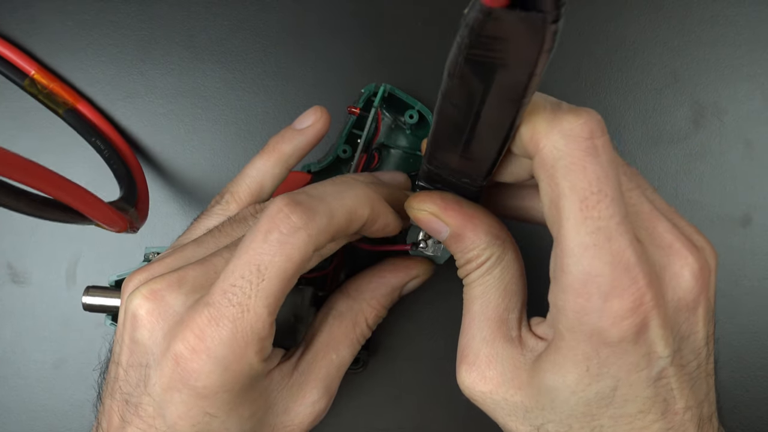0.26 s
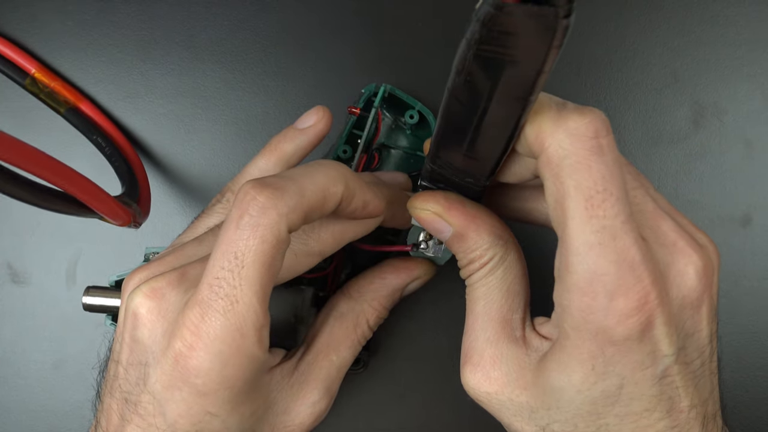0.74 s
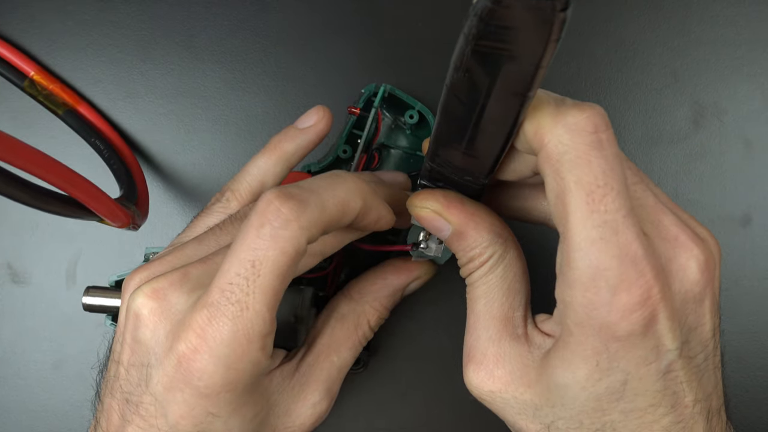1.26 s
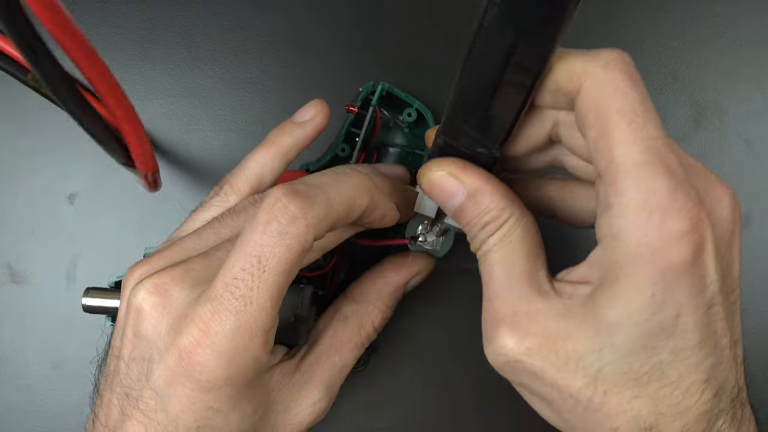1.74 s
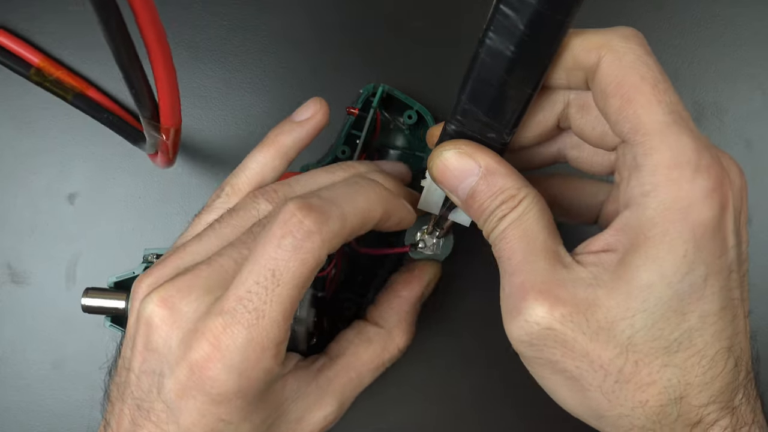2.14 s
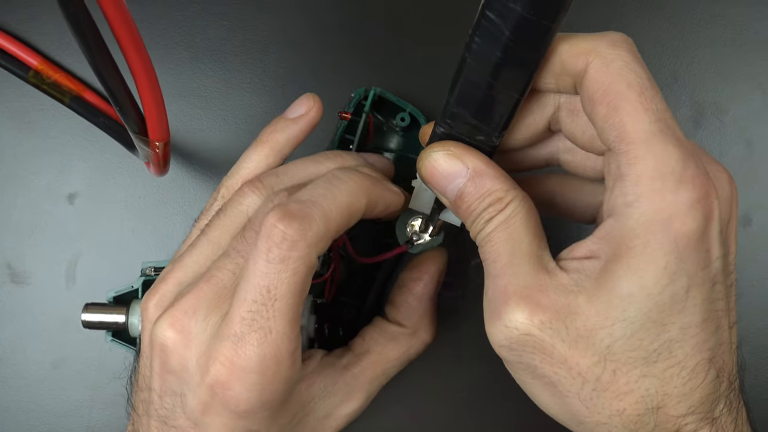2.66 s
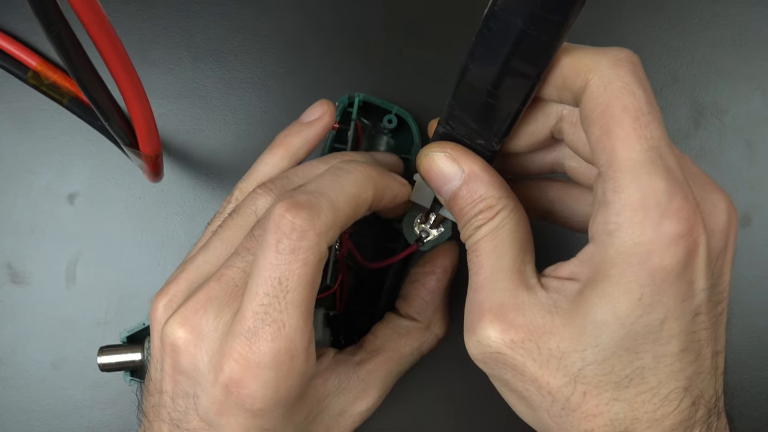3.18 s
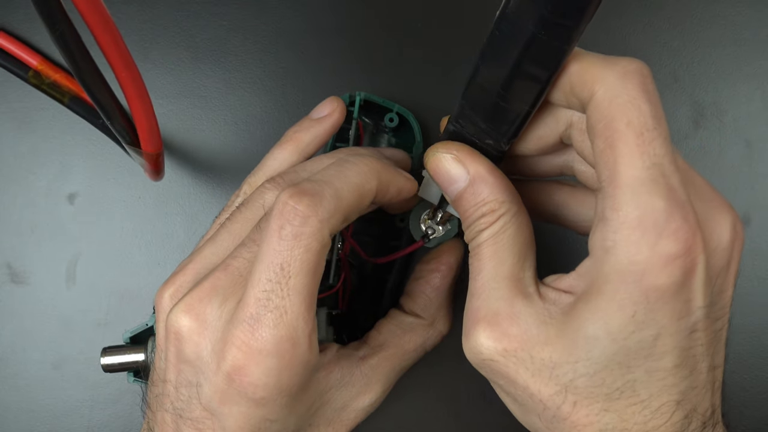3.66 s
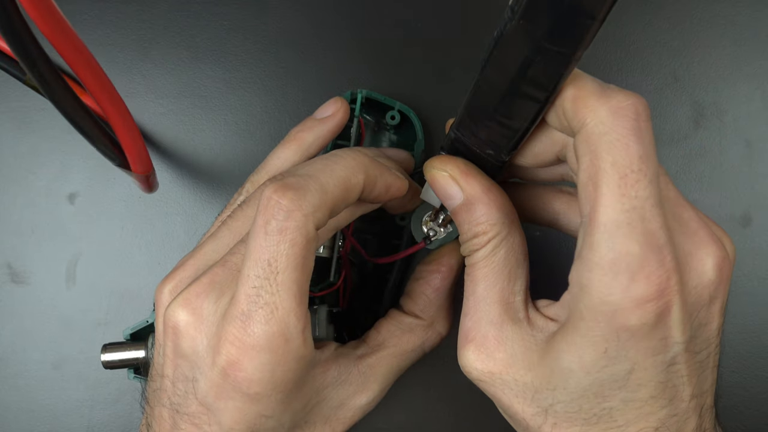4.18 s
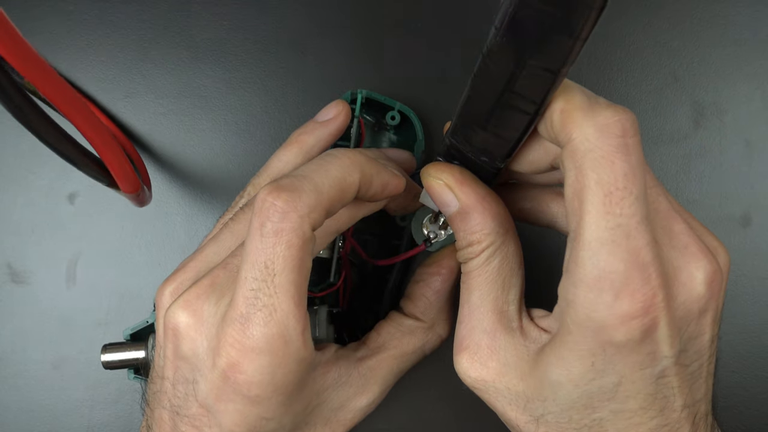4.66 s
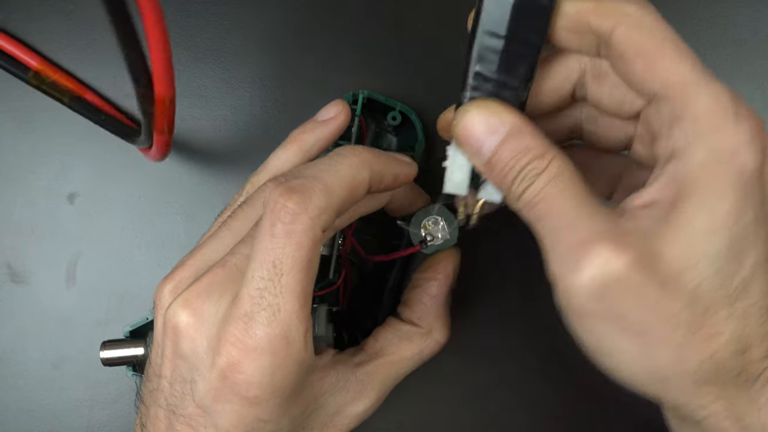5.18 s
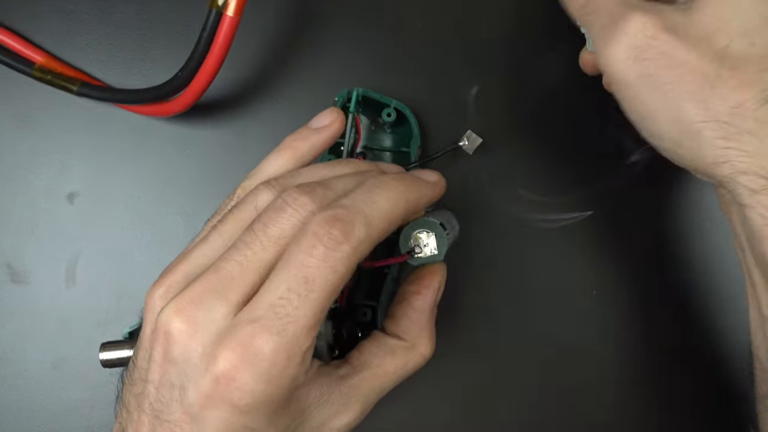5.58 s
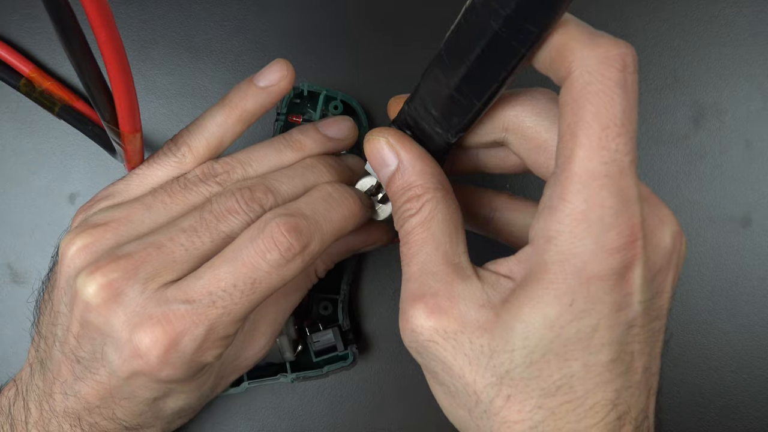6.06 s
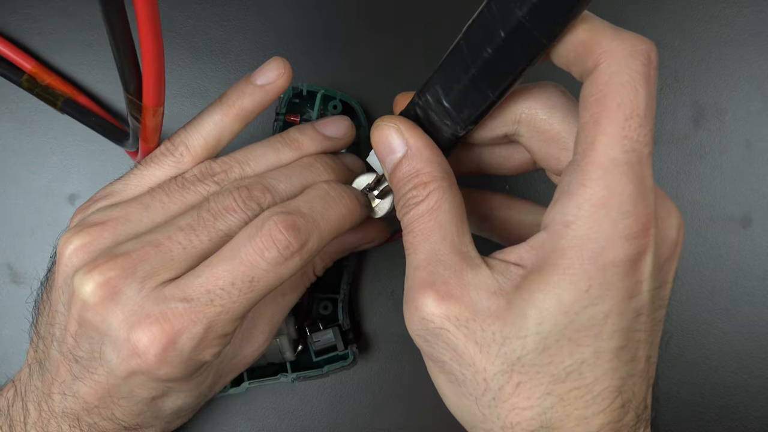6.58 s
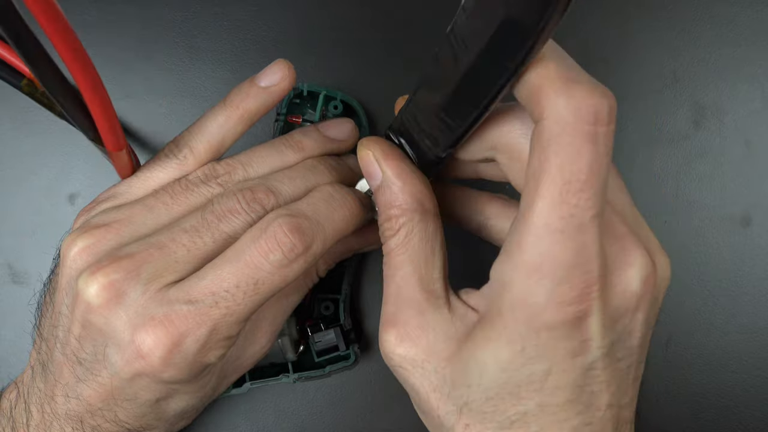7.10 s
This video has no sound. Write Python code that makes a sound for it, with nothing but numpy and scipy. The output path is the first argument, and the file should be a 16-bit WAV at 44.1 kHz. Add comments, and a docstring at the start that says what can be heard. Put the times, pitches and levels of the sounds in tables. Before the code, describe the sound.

Close-miked in a small, fairly dry workroom with faint hiss, fan whine and mains hum. A low engine drone rises and fades outside. Electrode tips tick and scrape on metal, then a spot weld cracks with a split-second sizzle. Tiny plastic taps follow, then a second weld. The tool and parts land in hard clacks, hands brush the bench, and near-quiet returns.

```python
"""A workbench with a handheld spot welder, in a small room with air hiss, a fan whine and mains hum.
Twice a switch clicks, a contactor slams shut, the weld sizzles and the contactor drops out: noise bursts and
noise grains ring the contactor's resonances. Parts knock, tap and slide on the bench: filtered bursts, damped
modes and uneven noise. An engine drones outside in two passes: a near sine with weak wavering overtones."""
import sys
import numpy as np
from scipy import signal
from scipy.fft import rfft, irfft
from scipy.io import wavfile
from scipy.ndimage import uniform_filter1d

SR = 44100
rng = np.random.default_rng(int(sys.argv[2]) if len(sys.argv) > 2 else 0)


def unload_audio(sound):
    """Save the sound as a 16-bit wav file, at the path given as the first command line argument."""
    columns = np.transpose(np.atleast_2d(sound))
    # keep every value between -1 and 1, then stretch to whole-number steps
    steps = np.round(np.clip(columns, -1, 1) * 32767)
    wavfile.write(sys.argv[1], SR, steps.astype(np.int16))


N = 323557
T = np.arange(N) / SR

# Room hiss spectrum: (frequency [Hz], relative density [dB per Hz])
AIR_COLOUR = [(15, -35), (30, -15.5), (45, -5), (70, -13.5), (100, -8), (125, -9), (195, -8), (300, -13),
              (450, -16.5), (700, -14.5), (1050, -13.5), (1350, -21), (4000, -27), (16000, -30)]
# Hiss level, mid channel: (time [s], level [dB])
AIR_LEVEL = [(0, -60.5), (1.5, -60.5), (3.3, -61.5), (4.5, -65), (5.2, -62), (5.9, -58.5), (5.96, -63.5),
             (6.9, -63.5), (7.34, -61)]
AIR_SIDE_DB = -10  # re mid
FAN_HZ, FAN_WIDTH_HZ, FAN_DB = 1093, 25, -72.5
HUM_HZ, HUM_DB = 100.5, -68.5

# Engine outside, one table a pass: (time [s], firing rate [Hz], level of the fundamental [dB])
ENGINE_PASSES = [
    [(0, 43.4, -45), (.12, 44.5, -47.5), (.4, 47.67, -42), (.75, 48.54, -43.5), (1.15, 51.34, -35.5),
     (1.47, 51.27, -42), (1.63, 50.8, -39.5), (2.0, 49.46, -46.5), (2.06, 47.76, -58), (2.45, 43.76, -57),
     (2.62, 41, -71), (2.78, 38.1, -58), (3.7, 37.1, -70), (4.5, 37.1, -72)],
    [(6.5, 43.1, -78.5), (7.19, 46.7, -58.5), (7.24, 47.7, -46.5), (7.34, 50.3, -58)],
]
# Engine overtones: (multiple of firing rate, relative level [dB])
ENGINE_ORDERS = [(2, -0.5), (3, -4.5), (4, -1), (5, -15)]
OVERTONES_DB, COASTING_DB = -17.5, -7  # re fundamental; further change while the firing rate falls
THROTTLE_S = .1  # smoothing of that change

# Electrode tips click on the strip: (time [s], peak before body ring [dB], centre [Hz], width / centre)
TIP_CLICKS = [(0.327, -38.5, 1030, 0.21), (.329, -45.5, 3020, 2.5), (.339, -38.5, 1080, .4),
              (.365, -51, 2350, .23), (.405, -51, 2400, .23), (.4235, -32, 3600, 1.1),
              (.445, -25, 3800, .9), (.467, -23, 3600, 1.1), (.480, -34.5, 940, .8), (.488, -31, 3500, 1.5),
              (.794, -34, 900, .9), (.808, -38.5, 1084, .3), (4.541, -27, 5000, 1.8),
              (4.543, -29.5, 897, 0.58)]
TIP_CLICK_T60_S = 0.05
# Electrode tips scrape into place: (time [s], level [dB])
SCRAPE = [(.33, -61), (.38, -59.5), (.418, -63.5), (.424, -47.5), (.44, -47.5), (.447, -37), (.47, -36),
          (.5, -44), (.525, -52)]
# Scrape spectrum: (frequency [Hz], relative density [dB per Hz])
SCRAPE_COLOUR = [(300, -18), (1000, -1), (1600, -11.5), (2400, -4.5), (2900, -8), (3450, 4), (3950, -11),
                 (4500, -3), (5500, -8.5), (7200, -6), (10000, -16.5), (16000, -27.5)]
# Welds; levels before body ring: (tips land [s], landing [dB], switch [s], switch centre [Hz],
# current on [s], current off [s], pull-in [dB], drop-out [dB], bounce after current off [s])
WELDS = [(.817, -23.5, .828, 810, .8440, 0.892, -5, -3.5, .022),
         (4.529, -31.5, 4.558, 1400, 4.5623, 4.6045, -5.5, -4, .015)]
# Tips landing: (t60 [s], centre [Hz], width / centre)
LANDING = (0.055, 3500, 0.74)
# Switch click: (level re pull-in [dB], t60 [s], width / centre)
SWITCH = (-13.5, .03, 0.54)
PRESS_DB, PRESS_RISE_DB = -11.5, 7  # tips grind in until current on: start re landing; swell
# Contactor closing: (time after current on [s], level re pull-in [dB], t60 [s], centre [Hz], width / centre)
PULL_IN = [(0, 1, .006, 8800, 1.15), (.004, -1.5, .04, 7000, 1.6), (.0063, -8, .04, 1680, .85)]
# Sizzle while current flows, one row a weld, before body ring:
# (start after current on [s], first level [dB], last level [dB])
SIZZLE = [(.005, -26.5, -18.5), (.005, -27, -27)]
# Sizzle spectrum: (frequency [Hz], relative density [dB per Hz])
SIZZLE_COLOUR = [(200, -39.5), (600, -15), (1500, -6), (2300, -9), (3500, -3.5), (7000, -11.5),
                 (12000, -17), (16000, -19)]
# Contactor opening: (level re drop-out [dB], t60 [s], centre [Hz], width / centre)
DROP_OUT = [(-10, .011, 9000, 2.8), (0, .035, 2850, 1.9)]
# Contactor bounce: (level re drop-out [dB], t60 [s], centre [Hz], width / centre)
BOUNCE = (-15, 0.2972, 2270, 3.2)
# Contactor body resonances: (centre [Hz], width [Hz], relative gain [dB])
CONTACTOR = [(1500, 650, -5), (2340, 130, -1), (3435, 83, 2), (4400, 400, -6), (6670, 600, -3.5),
             (7500, 400, -5), (9700, 1600, -7.5)]

# Light knocks on the bench: (time [s], crack peak [dB], crack centre [Hz], boom before bench modes [dB])
KNOCKS = [(.462, -43.5, 280, -43), (.814, -28.5, 240, -35), (2.418, -49, 2000, -75),
          (2.732, -47, 3300, -75), (4.524, -40, 220, -49), (4.546, -40, 230.3, -52.5),
          (4.608, -40, 420, -38.5), (4.909, -45.5, 2190, -68.5), (5.156, -46, 2830, -53),
          (5.185, -48, 3180, -70), (5.277, -26.5, 8000, -52), (5.290, -33, 2390, -54.5),
          (5.359, -51, 5970, -64.5), (5.52, -30, 420, -61), (5.534, -30.5, 2500, -61),
          (5.628, -35.5, 2170, -39.5), (5.698, -49.5, 5000, -64.5), (5.802, -13.5, 1100, -35),
          (5.818, -23.5, 474, -50), (7.119, -44.5, 586, -58), (7.148, -44, 550, -49),
          (7.18, -51.5, 420, -60.5)]
KNOCK_T60_S = 0.048  # at 1 kHz; goes as 1 / sqrt(frequency)
KNOCK_ROOM_DB, NEAR_DB_PER_DB = -6.5, 0.1962  # room send of a -10 dB knock; louder is nearer and drier
# Bench modes: (nominal frequency [Hz], relative level before tilt [dB], t60 [s])
BENCH = [(94.8, 1, 0.34), (153.5, -3.5, 0.37), (199, -11, 0.15), (280, -7.5, 0.11), (406, -13.5, 0.24)]
BOOM_TILT_DB_PER_OCTAVE = 2  # above the lowest mode
# Plastic housing taps and creaks under the fingers: (time [s], peak [dB], nominal pitch [Hz])
TAPS = [(1.481, -53, 610), (1.533, -57, 711.4), (1.589, -50, 619), (1.749, -55.5, 600), (1.879, -53, 721),
        (2.395, -43, 602), (2.407, -45, 639), (2.414, -32, 711), (2.426, -37.5, 717), (2.436, -31.5, 643),
        (2.450, -45, 638), (2.457, -42, 634), (2.556, -53, 680), (2.588, -50, 634), (2.573, -41.5, 648.6),
        (2.788, -51, 604.6), (2.876, -48.5, 617), (4.038, -45.5, 636.5), (4.263, -53.5, 648),
        (4.909, -42, 716), (4.929, -48.5, 657), (5.0, -48.5, 633), (5.066, -42.5, 677), (5.156, -34, 609),
        (5.289, -29, 689), (6.287, -51, 637), (7.258, -56.5, 800)]
# Housing modes: (nominal multiple of pitch, relative level [dB], t60 [s])
HOUSING = [(1, 3, .04), (1.3, -3, 0.034), (1.55, -15, .03)]
TAP_ROOM_DB = -12.5
# Heavy things set down: (time [s], crack peak [dB], crack centre [Hz], boom before bench modes [dB],
# edge centre [Hz], edge peak [dB], thud centre [Hz], thud peak [dB], room send [dB])
DROPS = [(5.2535, -12.5, 2300, -43.5, 7000, -28, 750, -23.5, -10.5),
         (5.492, -4.5, 2230, -21.5, 5500, -11.5, 400, -21, -8.5),
         (5.7834, -2.5, 844, -24.5, 4200, -12.5, 594, -15.5, -8.5)]
RATTLE_S, RATTLE_DB, THUD_LATE_S = .0028, -3.5, .003  # step between three landings; thud delay
DROP_T60_S, EDGE_T60_S, THUD_T60_S = .018, 0.023, .05
EDGE_ROOM_DB = 2.5  # extra room send of the edge click
# Metal parts of the dropped tool: (nominal frequency [Hz], relative level [dB], t60 [s])
TOOL = [(2020, 0, .06), (2755, -2.5, .1), (3365, -12.5, .09), (4790, -8, 0.079), (5809, -20, .1)]
TOOL_RING_DB = -10.5  # re edge click
# Hands and cable slide over the bench: (time [s], hold [s], level [dB])
SLIDES = [(5.255, .005, -50), (5.56, 0.068, -54.5), (5.70, .04, -57.5), (5.845, .11, -56.5)]
# Slide spectrum: (frequency [Hz], relative density [dB per Hz])
SLIDE_COLOUR = [(300, -4.5), (2000, 2), (4500, -0.5), (9000, -5.5), (16000, -18)]
SLIDE_ATTACK_S, SLIDE_RELEASE_S, SLIDE_FADE_DB = .045, .06, 17.5

# Room decay bands: (centre [Hz], t60 [s], level [dB], side re mid [dB])
ROOM = [(94, 0.3, -15, -22), (390, .3, -11.5, -18), (1500, .27, -10, -17), (4000, 0.18, -17.5, -12.5),
        (10000, 0.23, -11, -7)]
ROOM_GAP_S = .004  # delay of the first wall
# Short silence: (start [s], end [s])
SILENCE = (5.951, 5.960)
# Stereo balance: (frequency [Hz], left minus right [dB])
PAN = [(60, -1.24), (1500, -2), (4000, -0.7), (10000, 0.96)]
TOP_HZ = 16000


def undb(db):
    """Amplitude ratio from dB."""
    return 10 ** (np.asarray(db) / 20)


def unit(x):
    """Scale to RMS 1."""
    return x / np.sqrt(np.mean(x ** 2))


def ring(x, hz, width_hz):
    """Two-pole resonance, gain 1 at the centre."""
    return signal.lfilter(*signal.iirpeak(hz, hz / width_hz, fs=SR), x)


def colour(x, points):
    """Shape a spectrum by (frequency [Hz], gain [dB]) points, interpolated over log frequency."""
    hz, db = np.transpose(points)
    f = np.maximum(np.fft.rfftfreq(x.shape[-1], 1 / SR), 1)
    gain = undb(np.interp(np.log(f), np.log(hz), db))
    return irfft(rfft(x) * gain, x.shape[-1])


def walk(rate_hz):
    """Smooth random wander, RMS 1, from rate_hz random values a second."""
    k = int(SR / rate_hz)
    steps = np.repeat(rng.standard_normal(N // k + 1), k)
    return unit(uniform_filter1d(uniform_filter1d(steps, k), k)[:N])


def swell(table):
    """Gain that follows (time [s], level [dB]) rows, zero outside them."""
    s, db = np.transpose(table)
    return np.where((T > s[0]) & (T < s[-1]), undb(np.interp(T, s, db)), 0)


def grains(points, rate_hz, uneven_db):
    """Coloured noise, RMS 1, whose level wanders at rate_hz."""
    noise = rng.standard_normal(N) * undb(uneven_db * walk(rate_hz))
    return unit(colour(noise, points))


def add(out, s, x):
    """Mix x into out from time s."""
    i = int(s * SR)
    out[:, i:i + x.shape[-1]] += x[..., :N - i]


def crack(t60_s, hz, breadth, room_db):
    """Contact: decaying band noise of peak 1; for the room, a click of its energy offset by room_db."""
    t = T[:SR // 5]
    rattle = rng.standard_normal(len(t)) * undb(-60 * t / t60_s) + 3 * (t == 0)
    width_hz = min(breadth * hz, 15000)
    x = ring(ring(np.array([rattle, t == 0]), hz, width_hz), hz, width_hz)
    x[1] *= undb(room_db) * np.sqrt(np.sum(x[0] ** 2) / np.sum(x[1] ** 2))
    return x / np.abs(x[0]).max()


def modes(table, pitch, soft_s):
    """Damped modes, each randomly detuned, with an onset softened over soft_s."""
    t = T[:SR // 2]
    detune = 1 + .008 * rng.standard_normal(len(table))
    x = 0
    for (multiple, db, t60_s), d in zip(table, detune):
        x = x + undb(db - 60 * t / t60_s) * np.sin(2 * np.pi * multiple * pitch * d * t)
    return x * (1 - np.exp(-t / soft_s))


def background():
    """Stereo hiss, a narrow noise band for the fan whine and a wavering mains sine."""
    mid, side = (unit(x) for x in colour(rng.standard_normal((2, N)), AIR_COLOUR))
    stereo = mid + undb(AIR_SIDE_DB) * side * np.array([[1], [-1]])
    air = undb(np.interp(T, *np.transpose(AIR_LEVEL))) * stereo
    whine = ring(ring(rng.standard_normal(N), FAN_HZ, FAN_WIDTH_HZ), FAN_HZ, FAN_WIDTH_HZ)
    fan = undb(FAN_DB + 0.67 * walk(2)) * unit(whine)
    hum = np.sqrt(2) * undb(HUM_DB + 2.5 * walk(4.9)) * np.sin(2 * np.pi * HUM_HZ * T)
    return air + fan + hum


def engine():
    """Firing-rate sine with jitter, plus wavering overtones that sink while the rate falls."""
    out = np.zeros(N)
    for table in ENGINE_PASSES:
        s, hz, db = np.transpose(table)
        rate_hz = np.interp(T, s, hz)
        phase = 2 * np.pi * np.cumsum(rate_hz + .6 * walk(26)) / SR
        over = sum(undb(d + 4.0 * walk(13)) * np.sin(m * phase) for m, d in ENGINE_ORDERS)
        coasting = uniform_filter1d(1. * (np.gradient(rate_hz) < 0), int(THROTTLE_S * SR))
        shape = np.sin(phase) + undb(OVERTONES_DB + COASTING_DB * coasting) * over
        tone = undb(np.interp(T, s, db)) * shape
        out += np.sqrt(2) * tone * (T >= s[0]) * (T <= s[-1])
    return out


def welder():
    """Blows, tip grinding and sizzle ring the contactor body; the scrape does not. Rows: direct, to room."""
    blows = [(s, db, TIP_CLICK_T60_S, hz, breadth) for s, db, hz, breadth in TIP_CLICKS]
    gain = 0
    for weld, (wait_s, first_db, last_db) in zip(WELDS, SIZZLE):
        land, land_db, switch, switch_hz, on, off, pull_db, out_db, bounce_s = weld
        blows.append((land, land_db, *LANDING))
        blows.append((switch, pull_db + SWITCH[0], SWITCH[1], switch_hz, SWITCH[2]))
        blows += [(on + s, pull_db + d, *rest) for s, d, *rest in PULL_IN]
        blows += [(off, out_db + d, *rest) for d, *rest in DROP_OUT]
        blows.append((off + bounce_s, out_db + BOUNCE[0], *BOUNCE[1:]))
        press_db = land_db + PRESS_DB
        gain = gain + swell([(land, press_db), (on, press_db + PRESS_RISE_DB)])
        gain = gain + swell([(on + wait_s, first_db), (off - .002, last_db)])
    raw = gain * grains(SIZZLE_COLOUR, 2000, 2.1) * np.ones((2, 1))
    for s, db, t60_s, hz, breadth in blows:
        add(raw, s, undb(db) * crack(t60_s, hz, breadth, 0))
    resonances = sum(undb(db) * ring(raw, hz, width_hz) for hz, width_hz, db in CONTACTOR)
    body = .75 * raw + .9 * resonances
    return body + swell(SCRAPE) * grains(SCRAPE_COLOUR, 370, 3.0)


def knocks():
    """Light contact: a crack, longer at low frequency, and a bench boom. Returns crack and boom lists."""
    cracks, booms = [], []
    for s, db, hz, boom_db in KNOCKS:
        room_db = KNOCK_ROOM_DB - NEAR_DB_PER_DB * (db + 10)
        cracks.append((s, db, hz, KNOCK_T60_S * np.sqrt(1000 / hz), room_db))
        booms.append((s, boom_db))
    return cracks, booms


def drops():
    """Heavy contact: three weakening cracks, edge click, late thud and boom. Returns crack and boom lists."""
    cracks, booms = [], []
    for s, db, hz, boom_db, edge_hz, edge_db, thud_hz, thud_db, room_db in DROPS:
        for k in range(3):
            cracks.append((s + k * RATTLE_S, db + k * RATTLE_DB, hz, DROP_T60_S, room_db))
        cracks.append((s, edge_db, edge_hz, EDGE_T60_S, room_db + EDGE_ROOM_DB))
        cracks.append((s + THUD_LATE_S, thud_db, thud_hz, THUD_T60_S, room_db))
        booms.append((s, boom_db))
    return cracks, booms


def slides():
    """Friction: uneven noise that fades in, holds and fades out."""
    gain = 0
    for s, hold_s, db in SLIDES:
        end = s + hold_s
        fade_db = db - SLIDE_FADE_DB
        gain = gain + swell([(s - SLIDE_ATTACK_S, fade_db), (s, db), (end, db), (end + SLIDE_RELEASE_S, fade_db)])
    return gain * grains(SLIDE_COLOUR, 120, 3.8)


def handling():
    """Impacts excite bench, tool and housing modes; hands slide. Rows: direct, to room."""
    out = np.zeros((2, N))
    knock_cracks, knock_booms = knocks()
    drop_cracks, drop_booms = drops()
    for s, db, hz, t60_s, room_db in knock_cracks + drop_cracks:
        add(out, s, undb(db) * crack(t60_s, hz, .7 if hz < 780 else 1.2, room_db))
    bench = [(f, d + BOOM_TILT_DB_PER_OCTAVE * np.log2(f / BENCH[0][0]), t60_s) for f, d, t60_s in BENCH]
    for s, db in knock_booms + drop_booms:
        add(out[:1], s, undb(db) * modes(bench, 0.99, 0.0053))
    for s, db, hz in TAPS:
        tap = modes(HOUSING, hz, 0.0018)
        add(out, s, undb([[db], [db + TAP_ROOM_DB]]) * tap / np.abs(tap).max())
    for s, _, _, _, _, edge_db, *_ in DROPS:
        add(out[:1], s, undb(edge_db + TOOL_RING_DB) * modes(TOOL, 0.98, .0003))
    out[0] += slides()
    return out


def room(x):
    """Small-room reverberation: bands of decaying noise, different left and right."""
    t, answer = T[:SR // 2], 0
    for hz, t60_s, db, side_db in ROOM:
        mid, side = ring(rng.standard_normal((2, len(t))), hz, 1.2 * hz)
        band = unit(mid) + undb(side_db) * unit(side) * np.array([[1], [-1]])
        energy_norm = np.sqrt(np.log(1e6) / t60_s / SR)
        answer = answer + undb(db - 60 * t / t60_s) * band * energy_norm
    onset = np.clip((t - ROOM_GAP_S) / 0.005, 0, 1)
    return signal.fftconvolve(x[None], answer * onset, axes=1)[:, :N]


def scene():
    """Sum all sources; a short silence cuts the ringing, then only hiss, fan, hum and engine return at once."""
    near, sent = welder() + handling()
    stop, back = SILENCE
    before = T < stop
    wet = np.where(before, room(sent), room(sent * (T > stop + .5)))
    near = near * (before | (T > stop + .25))
    heard = np.interp(T, [stop - .002, stop, back, back + 0.0015], [1, 0, 0, 1])
    mix = heard * (near + wet + engine() + background())
    left = colour(mix[0], [(hz, db / 2) for hz, db in PAN])
    right = colour(mix[1], [(hz, -db / 2) for hz, db in PAN])
    return np.array([left, right])


def record(dry):
    """Soft-clip the loudest peaks, then low-pass steeply at TOP_HZ."""
    lowpass = signal.ellip(10, .2, 80, TOP_HZ, fs=SR, output="sos")
    return signal.sosfilt(lowpass, np.tanh(1.1 * dry) / 1.1)


dry = scene()
out = record(dry)
unload_audio(out)
```